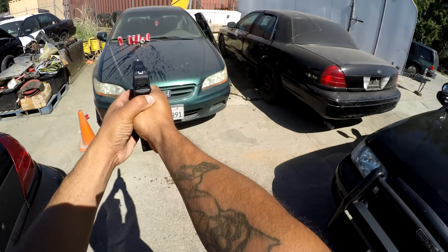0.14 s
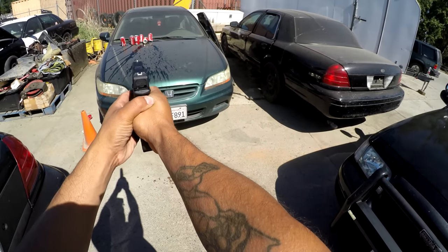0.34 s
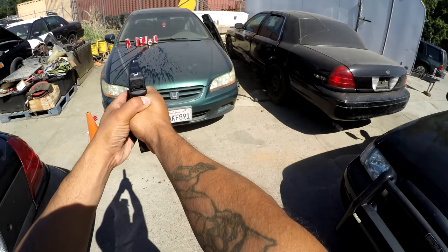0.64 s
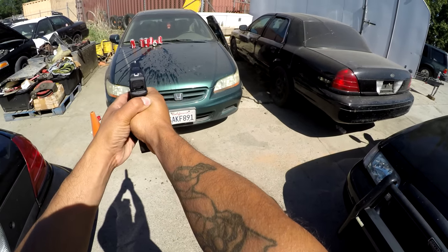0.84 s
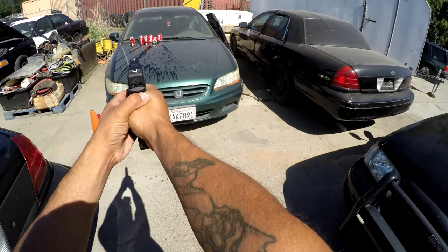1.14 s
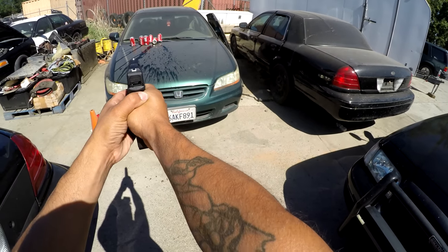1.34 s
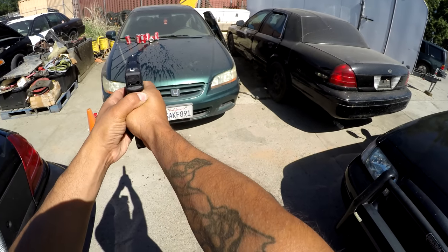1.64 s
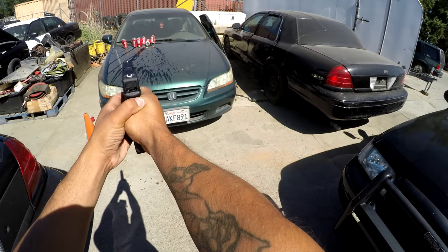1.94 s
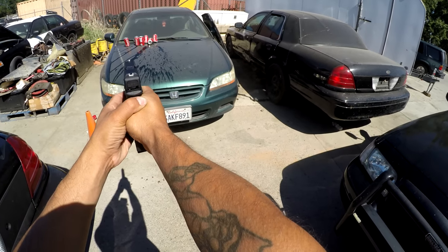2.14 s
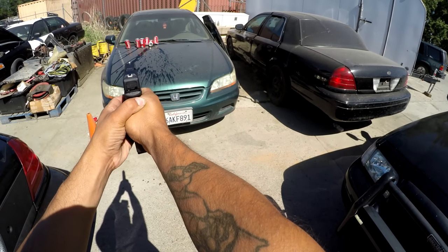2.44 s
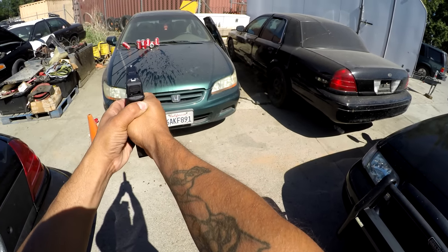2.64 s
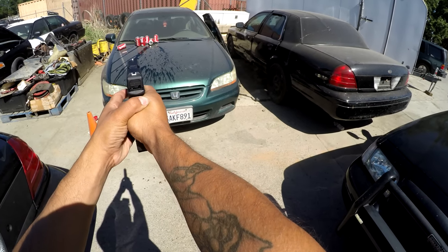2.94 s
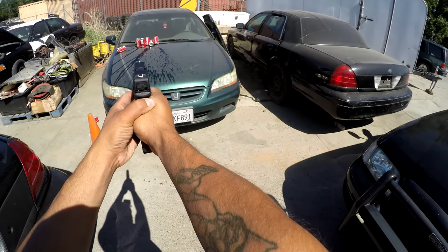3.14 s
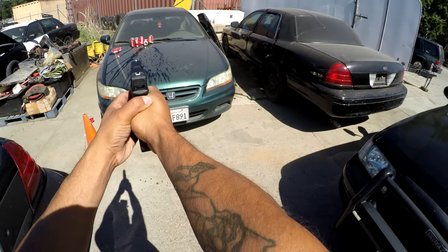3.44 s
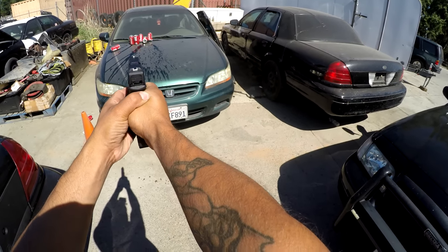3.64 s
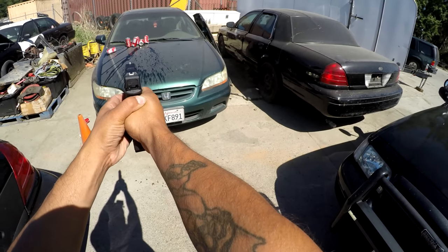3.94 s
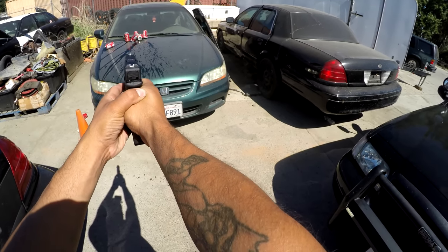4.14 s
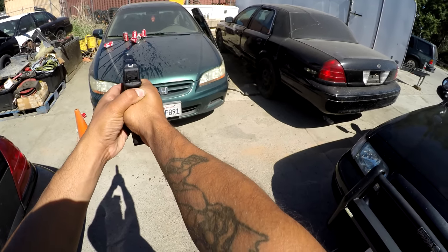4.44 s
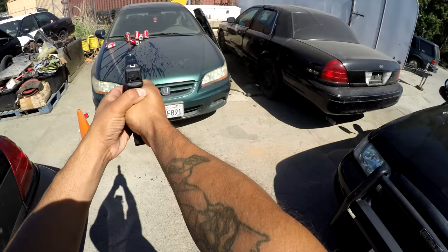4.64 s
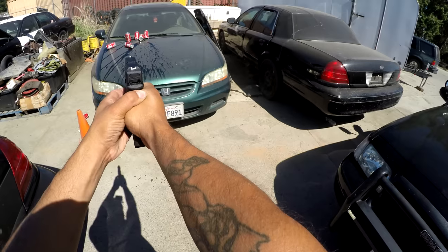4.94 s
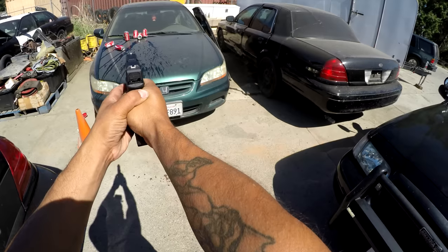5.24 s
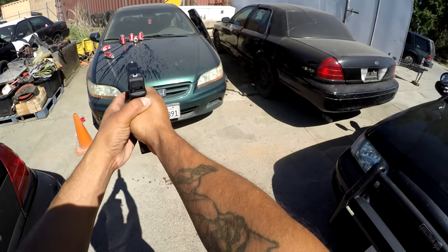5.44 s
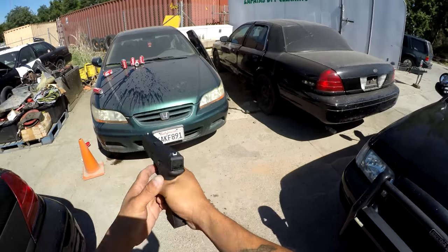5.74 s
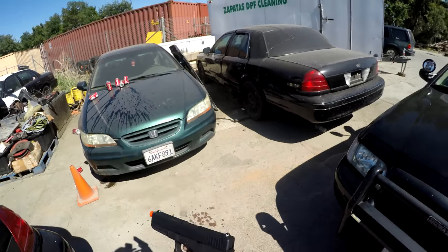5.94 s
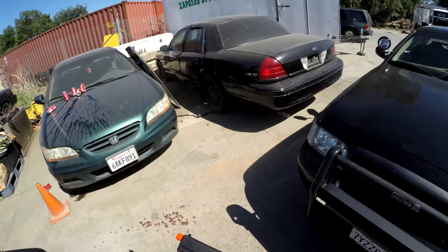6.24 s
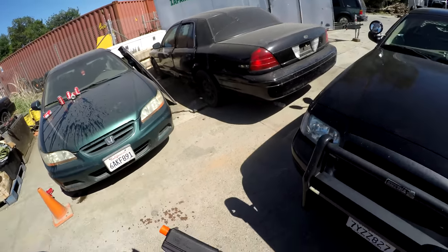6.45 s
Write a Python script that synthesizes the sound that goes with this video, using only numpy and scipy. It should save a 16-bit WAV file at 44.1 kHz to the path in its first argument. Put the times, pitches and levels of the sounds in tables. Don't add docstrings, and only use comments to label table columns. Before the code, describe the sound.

In an open paved yard, faint wind and a far road drone precede a small click, then four loud distorted airsoft pistol shots a little over a second apart. After the second, cans thud and rattle across thin car metal; more thuds and tinny rings follow the later shots. The close microphone overloads and its background sinks after each shot. A magazine catch snaps near the end, then a heavier metallic knock rings.

```python
import sys
import numpy as np
from scipy import signal
from scipy.io import wavfile

SR = 44100
rng = np.random.default_rng(int(sys.argv[2]) if len(sys.argv) > 2 else 0)


def master(y):
    cut = np.clip(np.atleast_2d(y).T, -1, 1)
    pcm = np.round(cut * 32767)
    wavfile.write(sys.argv[1], SR, pcm.astype(np.int16))


def decibels_to_gain(level_db):
    exponent = np.asarray(level_db, float) / 20
    return 10 ** exponent


N = 290178


def rms_one(x):
    return x / np.sqrt(np.mean(x ** 2) + 1e-20)


def at_hz(points, hz):
    table = np.array(points)
    return np.interp(np.log(hz), np.log(table[:, 0]), table[:, 1])


def in_time(rows):
    s, *columns = np.transpose(rows)
    return [np.interp(np.arange(N) / SR, s, c) for c in columns]


def clicks(rows, db):
    out = np.full(N, 1e-18)
    out[(np.array(rows)[:, 0] * SR).astype(int)] = decibels_to_gain(db)
    return out


def band(x, low_hz, high_hz):
    return signal.sosfilt(signal.butter(2, [low_hz, high_hz], "band", fs=SR, output="sos"), x)


def flicker(rate):
    r = np.exp(-2 * np.pi * rate / SR)
    wander = signal.lfilter([1], [1, -2 * r, r * r], rng.standard_normal(N + SR))
    return rms_one(wander[SR:])


EDGES = 100 * 2 ** np.arange(0, 7.6, .5)


def coloured(spectrum, shape):
    white = rng.standard_normal((2, N))
    mids = np.sqrt(EDGES[1:] * EDGES[:-1])
    gains = decibels_to_gain(at_hz(spectrum, mids))
    gains = gains / np.sqrt(np.sum(gains ** 2 * np.diff(EDGES)) / (SR / 2))
    used = [k for k in range(len(mids)) if gains[k] > gains.max() / 300]
    return sum(gains[k] * band(white[k % 2] * shape(mids[k]), EDGES[k], EDGES[k + 1]) for k in used)


def puffs(rows, db, spectrum, t60s):
    starts = clicks(rows, db)

    def dying(hz):
        return signal.lfilter([1], [1, -decibels_to_gain(-60 / (at_hz(t60s, hz) * SR))], starts)

    return coloured(spectrum, dying)


def struck(rows, db, modes, spread_db, contact_s=0):
    out, luck = 0, rng.standard_normal((len(rows), len(modes)))
    fade = decibels_to_gain(-60 / (contact_s * SR + 1e-9))
    for k, (hz, mode_db, t60) in enumerate(modes):
        r, w = decibels_to_gain(-60 / (t60 * SR)), 2 * np.pi * hz / SR
        hits = clicks(rows, db + mode_db + spread_db * luck[:, k])
        if contact_s:
            hits = signal.lfilter([np.sqrt(1 - fade ** 2)], [1, -fade], hits) * rng.standard_normal(N)
        out = out + signal.lfilter([0, np.sin(w)], [1, -2 * r * np.cos(w), r * r], hits)
    return out


def wavering(modes, strikes):
    out = np.zeros(N + SR)
    place = np.linspace(-2, 2, 9)
    all_lucks = rng.uniform(-0.79, 1, (len(strikes), len(modes), 9))
    for (s, db, near_hz, loss_db), lucks in zip(strikes, all_lucks):
        i = round(s * SR)
        for (hz, width_hz, mode_db, t60), luck in zip(modes, lucks):
            level_db = db + mode_db - loss_db * np.log2(hz / near_hz) ** 2
            if level_db < -80:
                continue
            age = np.arange(int(t60 * SR * (level_db + 90) / 60)) / SR
            cluster = hz + width_hz * (place + luck / 4)
            sines = np.sin(2 * np.pi * cluster[:, None] * age + luck[::-1, None])
            tone = np.exp(-place ** 2 / 2) / 2 @ sines
            onset = -np.expm1(-age / 0.00098)
            out[i:i + len(age)] += tone * decibels_to_gain(level_db - 60 * age / t60) * onset
    return out[:N]


# start in seconds, strength in dB
SHOTS = [
    (1.3360, 0),
    (2.4920, 0),
    (3.7224, 0),
    (4.8162, 0),
]
EARLIER_SHOT_S, DUCK_DB = -0.38, -8.5
DUCK_ATTACK_S, DUCK_HOLD_S, RECOVER_S = 0.15, 0.37, 0.48


def ducking():
    shape = np.cumsum([0, DUCK_ATTACK_S, DUCK_HOLD_S, RECOVER_S])
    starts = [EARLIER_SHOT_S] + [s for s, db in SHOTS]
    t = np.arange(N) / SR
    return np.min([np.interp(t, s + shape, [0, DUCK_DB, DUCK_DB, 0]) for s in starts], axis=0)


# time in seconds, level in dB
GUSTS = [(0, -44.5), (.14, -46), (.38, -44), (.6, -50), (.79, -42.5), (1.23, -42), (1.61, -49),
         (1.76, -46.5), (1.96, -52), (2.46, -42), (3.0, -46), (3.26, -44), (3.74, -34.5), (4.13, -49.5),
         (4.99, -42.5), (5.31, -49), (5.68, -44), (6.58, -43.5)]
# time in seconds, engine drone in dB, traffic in dB,
# tyre hiss change in dB
ROAD = [(0, -39.5, -45.5, 2), (.6, -41.5, -48, 0.5), (1.3, -44.5, -48.5, 0.5), (1.65, -47, -51, 4),
        (1.8, -42.5, -50, -1.5), (2.3, -46.5, -51, -2), (3.2, -43.5, -45, 2.5), (3.6, -41.5, -49, 1.5),
        (4.1, -43.5, -49.5, -6), (4.4, -42, -49.5, -1.5), (5.3, -43.5, -44.5, -1), (5.7, -39, -46, 3.5),
        (5.95, -46.5, -48.5, 2), (6.2, -35.5, -46, 1), (6.4, -48.5, -48.5, 3), (6.58, -37.5, -36, 5)]
# pitch in Hz, width in Hz, level in dB
DRONE = [(57, 9.2, -2.5), (116, 4.2, -2), (136.14, 7, -2), (172.7, 14, -10.5), (227.1, 7.2, -9.5),
         (126, 34, -7), (214, 60, -10)]
# frequency in Hz, level in dB per Hz
TRAFFIC = [(150, -32), (260, -1.5), (459, -3), (505, -5), (874, -10.5), (1310, -17.5), (2500, -28.5),
           (3250, -63.5), (5500, -120)]
# frequency in Hz, level in dB per Hz
HISS = [(1180, -26.5), (2000, 1), (4230, -7.5), (4990, -9), (14700, -21.5), (15600, -24.5), (16000, -43)]
WIND_DUCKS, DRONE_DUCKS, HISS_DUCKS = 0.42, 1.2, 0.66
HISS_DB, FAR_WASH_DB, FAR_WASH_T60_S = -65, -56, 1.4


def air():
    duck_db = ducking()
    (wind_db,), (drone_db, traffic_db, tyre_db) = in_time(GUSTS), in_time(ROAD)
    wind = rms_one(band(rng.standard_normal(N), 6.1, 77))
    wind = wind * decibels_to_gain(wind_db + WIND_DUCKS * duck_db + 2.0 * flicker(8.1) + 2.0)
    drone = 0
    for hz, width, db in DRONE:
        line = band(rng.standard_normal(N), hz - width / 2, hz + width / 2)
        drone = drone + decibels_to_gain(db) * rms_one(line)
    drone = drone * decibels_to_gain(drone_db + DRONE_DUCKS * duck_db - 2.0)
    traffic = coloured(TRAFFIC, lambda hz: decibels_to_gain(0.5 * flicker(8.1)))
    traffic = traffic * decibels_to_gain(traffic_db + duck_db - 3.0)
    late = clicks([(s + 0.067, db) for s, db in SHOTS], FAR_WASH_DB)
    wash = signal.lfilter([1], [1, -decibels_to_gain(-60 / (FAR_WASH_T60_S * SR))], late)
    steady = decibels_to_gain(HISS_DB + tyre_db + HISS_DUCKS * duck_db - 1.5)
    hiss = coloured(HISS, lambda hz: 1) * np.hypot(steady, wash)
    return wind + drone + traffic + hiss


# start in seconds, level in dB, pitch in Hz, length in seconds
BUFFETS = [
    (3.018, -36, 46.3, 0.07),
    (3.172, -28.5, 37.7, 0.098),
    (3.276, -29, 44.2, 0.12),
    (3.404, -34, 55.6, 0.049),
    (3.493, -31, 43.2, .12),
    (3.646, -33.5, 40, 0.12),
]


def buffets():
    out = np.zeros(N)
    for s, db, hz, length in BUFFETS:
        age, i = np.arange(int(length * SR)) / SR, round(s * SR)
        sway = np.sin(2 * np.pi * hz * age + rng.uniform(0, 2 * np.pi))
        out[i:i + len(age)] += decibels_to_gain(db) * np.sin(np.pi * age / length) * sway
    return out


# frequency in Hz, level in dB per Hz
JET = [(400, -4), (600, -11.5), (1000, -6.5), (3000, -8), (5000, -14), (8000, -20.5), (12000, -21),
       (14500, -20.5), (16500, -30.5)]
# frequency in Hz, level in dB per Hz
YARD = [(88, -29.5), (150, 0.5), (475, -6), (555, -10.5), (1290, -4), (1420, -16.5), (3620, -15.5),
        (14800, -48), (16000, -57.5)]
# frequency in Hz, t60 in seconds
YARD_T60 = [(200, 0.42), (1000, 0.24), (4000, 0.52), (14000, .2)]


def yard():
    early = [(s + 0.016, db) for s, db in SHOTS]
    late = [(s + 0.037, db) for s, db in SHOTS]
    first = puffs(early, -21.5, JET, [(300, 0.013), (3000, 0.094), (14000, 0.069)])
    return first + puffs(late, -34.5, YARD, YARD_T60)


# start in seconds, peak in dB
THUDS = [
    (2.762, -27.5),
    (3.311, -35),
    (4.245, -27),
    (4.352, -29),
    (5.488, -30),
    (5.641, -49),
]
# frequency in Hz, level in dB per Hz
THUD = [(88, -40.5), (150, -1), (231, -1.5), (470, -3), (1220, -11), (1500, -12), (2130, -22),
        (6000, -33.5), (7800, -67), (13200, -120)]
# pitch in Hz, width in Hz, level in dB, t60 in seconds
PANEL = [(453, 40, -2, .45), (850, 50, -2, .35), (1230, 95, -2, .28), (1950, 60, -8, .15),
         (2320, 85, -6, .17), (2900, 110, -9, .08), (3270, 120, -7, .13), (3850, 110, -9, .07),
         (4200, 120, -4, .06)]
# start in seconds, level in dB, favoured pitch in Hz, loss in dB one octave away
PANEL_STRIKES = [(1.419, -40, 1010, 5.9), (1.5, -44.5, 1010, 7.7), (2.049, -65, 2300, 48),
                 (2.761, -40.5, 1120, 1.2), (2.827, -46, 2560, 2.3), (2.888, -50, 3300, 13),
                 (2.89, -48, 1240, 27), (2.945, -49, 1870, 3.8), (3.052, -49, 2760, 3.7),
                 (3.111, -40, 4280, 47), (3.177, -47.5, 2700, 18), (3.248, -48, 2610, 12),
                 (3.31, -43.5, 1260, 54), (3.348, -41.5, 3270, 60)]


def bonnet():
    thuds = puffs(THUDS, np.array(THUDS)[:, 1] - 9, THUD, [(200, 0.69), (1000, 0.31), (5000, 0.13)])
    return thuds + wavering(PANEL, PANEL_STRIKES)


# start in seconds, peak in dB
PELLETS = [(1.609, -34), (1.7972, -40.5), (1.8394, -53), (1.8646, -56), (1.9063, -47), (1.978, -51),
           (2.0144, -57), (4.244, -37), (4.597, -47), (4.626, -42.5), (4.658, -36), (5.5957, -47),
           (5.789, -49), (5.8494, -47.5)]
PELLET_RING_DB = -40
# start in seconds, peak in dB, ring share in dB
HOPS = [(1.7844, -62, 8), (2.7599, -36.5, 5), (2.826, -44, -15), (2.8499, -59, 16), (2.873, -57, 8),
        (2.8865, -51, 1), (2.9453, -48, -8), (2.9914, -45, -10.5), (3.0247, -56, 6), (3.049, -51, 5.5),
        (3.1093, -42.5, 8.5), (3.1762, -46.5, 7), (3.247, -48.5, 10), (3.3099, -48, 8.5), (3.3496, -51, 11),
        (3.4283, -64, 5.5), (3.4472, -57, -1), (4.3083, -46, 8), (4.3515, -51.5, 15), (4.3891, -44.5, 2),
        (5.119, -61, -1), (5.4874, -64, -2.5), (5.6385, -48, -12)]
# pitch in Hz, level in dB, t60 in seconds
CAN = [(1250, -20, .05), (1950, -15, .06), (2250, -14, .07), (2400, -14, .07), (2900, -14, .05),
       (3150, -13, .06), (3350, -13, .06), (3850, -14, .05), (4150, -14, .035), (4400, -15, .035),
       (5100, -17, .03), (5800, -19, .03), (6600, -19, .03)]
# frequency in Hz, level in dB per Hz
BOUNCE = [(1200, -30.5), (2000, -2.5), (3000, -6.5), (4200, 2.5), (7000, -7), (11000, -9), (15000, -17.5),
          (16500, -42)]


def bounces():
    rows = HOPS + [(s, db, PELLET_RING_DB) for s, db in PELLETS]
    s, db, ring_db = np.transpose(rows)
    cans = struck(rows, db + ring_db - 6, CAN, spread_db=4, contact_s=.05)
    return cans + puffs(rows, db - 13.5, BOUNCE, [(2000, 0.11), (14000, 0.074)])


# pitch in Hz, width in Hz, level in dB, t60 in seconds
TIN = [(465, 16.6, -4.5, 0.23), (1350, 40, 6, 0.25), (3230, 73, -3, 0.29), (3600, 110, -5, 0.52)]
# start in seconds, level in dB, favoured pitch in Hz, loss in dB one octave away
TIN_STRIKES = [(4.247, -57, 1510, 1.3), (4.255, -54, 3400, 30), (4.257, -35, 465, 20), (4.36, -45, 465, 20),
               (4.626, -61.5, 3700, 55), (5.50, -45, 465, 18), (5.595, -59, 1350, 34),
               (5.595, -57, 3180, 230), (5.64, -38, 465, 20), (5.65, -62, 3220, 190),
               (5.79, -57, 3080, 240)]
# pitch in Hz, width in Hz, level in dB, t60 in seconds
RIM = [(5000, 50, 2, 0.15), (7100, 60, -2, .08), (8700, 40, -6, .11)]
# start in seconds, level in dB, favoured pitch in Hz, loss in dB one octave away
RIM_STRIKES = [
    (1.84, -70, 8700, 99.2),
    (1.865, -67, 5000, 99),
    (1.909, -65, 7100, 99),
]
# start in seconds, #
# level in dB, pitch in Hz, t60 in seconds
PINGS = [(1.572, -51, 1215, 0.21), (1.60, -60, 1250, .3), (1.655, -65, 1240, 0.43), (1.55, -62.5, 1340, .4),
         (4.36, -65, 1400, .5), (6.30, -61, 3430, 0.9), (6.49, -37, 3000, 0.37), (3.805, -56, 2150, 0.46),
         (3.805, -55, 3590, .3), (4.247, -57, 2147, 0.45), (4.30, -65, 2163, 0.46),
         (4.353, -57, 2100, 0.43), (4.40, -63.5, 2070, 0.67), (4.665, -62.5, 2050, 0.22),
         (5.505, -58, 2056, 0.38)]
PING_WIDTH_HZ = 3


def can_rings():
    pings = sum(wavering([(hz, PING_WIDTH_HZ, 0, t60)], [(s, db, hz, 0)]) for s, db, hz, t60 in PINGS)
    return wavering(TIN, TIN_STRIKES) + wavering(RIM, RIM_STRIKES) + pings


# start in seconds, crack in dB
LATCH = [
    (6.1832, -43),
    (6.2084, -38),
    (6.2147, -30),
    (6.2174, -29),
    (6.4836, -22),
    (6.4855, -27),
    (6.5002, -30),
]
KNOCK_DB = [-42, -24, -9, -14, -24, -4, -20]
# pitch in Hz, level in dB, t60 in seconds
KNOCK = [(1000, -8, .008), (1250, -4, .009), (1500, -1, .013), (1800, -4, .010)]
# frequency in Hz, level in dB per Hz
LATCH_CRACK = [(320, -36), (550, 7), (994, -12), (1280, -7), (1800, -4), (2560, -17), (3490, -20),
               (4020, -9.5), (13900, -29), (16000, -57)]
# pitch in Hz, width in Hz, level in dB, t60 in seconds
CATCH = [(413, 28.5, -6.5, 0.18), (1760, 23, -12, 0.13), (1980, 15.4, -21.5, 0.37), (2290, 33, -16, 0.18),
         (3500, 14, -6.5, 0.15), (3290, 48, -13.5, 0.24), (3430, 68, -18, 0.33), (755, 31.6, -30, 0.65),
         (1071, 30, -30, .2), (4300, 30, -34, .2), (6370, 88, -4, 0.035)]
# start in seconds, level in dB, favoured pitch in Hz, loss in dB one octave away
CATCH_STRIKES = [
    (6.184, -39, 3380, 19.3),
    (6.217, -18, 3400, 0.088),
]
# pitch in Hz, width in Hz, level in dB, t60 in seconds
MAGAZINE = [(1007, 3, -17, .36), (2019, 4, -20, .25), (1815, 12, -10, .12), (2990, 12, -27, .25),
            (750, 25, -20, .2), (2740, 20, -22, .15), (3165, 20, -15, .14), (3273, 20, -15, .16),
            (3460, 90, -10, .1), (3725, 30, -20, .16), (4183, 30, -25, .2), (4900, 50, -14, .07),
            (5367, 30, -18, .1), (7050, 50, -10, .05)]
# start in seconds, level in dB, favoured pitch in Hz, loss in dB one octave away
MAGAZINE_STRIKES = [
    (6.4859, -13.5, 3300, 0.1),
    (6.4917, -7, 3450, 32),
]


def magazine():
    crack_db = np.array(LATCH)[:, 1]
    knocks = -band(struck(LATCH, np.array(KNOCK_DB), KNOCK, spread_db=1), 600, 3000)
    tail = puffs(LATCH, crack_db - 16.0, LATCH_CRACK, [(500, 0.34), (3000, 0.44), (14000, 0.069)])
    crack_t60 = [(400, 0.042), (2000, 0.15), (6000, 0.086), (14000, 0.045)]
    crack = puffs(LATCH, crack_db, LATCH_CRACK, crack_t60)
    rings = wavering(CATCH, CATCH_STRIKES) + wavering(MAGAZINE, MAGAZINE_STRIKES)
    return knocks + tail + crack + rings


# start in seconds, peak in dB, low ring in dB
TRIGGER = [(1.3054, -20, -6), (1.3150, -24, -6), (1.4764, -36, -6), (1.4850, -23, -14), (1.5419, -45, -3),
           (2.2254, -27, 0), (2.2662, -48, -3), (2.6469, -20, -6), (3.3922, -24, 0), (3.8912, -21, -7),
           (3.911, -42, -12), (3.99, -52, -12), (4.0792, -46, -12), (4.1346, -52, -12), (4.5327, -26, 0),
           (4.5694, -50, -8), (4.7855, -42, -3), (4.905, -40, -8), (4.958, -44, 3), (4.9693, -22, -4),
           (5.007, -42, -8)]
# pitch in Hz, level in dB, t60 in seconds
SEAR = [(2600, -10, .006), (3200, -7, .006), (4200, -1, .008), (4600, -1, .009), (5200, -8, .006),
        (6600, -9, .007), (7600, -12, .006), (9000, -11, .006)]
# pitch in Hz, width in Hz, level in dB, t60 in seconds
SPRING = [(4700, 4, -7, 2.2), (5200, 6, -4, 1.0), (5600, 5, -1, 1.3), (7750, 5, -1, 1.0)]
# start in seconds, level in dB, favoured pitch in Hz, loss in dB one octave away
SPRING_STRIKES = [
    (4.99, -70, 5500, 1),
]


def trigger():
    s, db, low_db = np.transpose(TRIGGER)
    low = struck(TRIGGER, db + low_db - 9, [(2080, 0, .018)], spread_db=0)
    sear = struck(TRIGGER, db - 9, SEAR, spread_db=1, contact_s=.012)
    tick = puffs(TRIGGER, db - 10, BOUNCE, [(2000, 0.0035), (14000, 0.0011)])
    return low + sear + tick + wavering(SPRING, SPRING_STRIKES)


# start in
# seconds, # peak in dB, low share in dB
SLAMS = [(1.3723, 1, -0.5), (1.38, -11.5, -3.5), (1.3895, -19, -28.5), (1.411, -24, -2.5), (2.528, -4, -21),
         (2.5365, -12.5, -25.5), (2.5456, -22, -8.5), (3.7576, 0, -23.5), (3.769, -11, -27.5),
         (3.7755, -17, -9.5), (4.2438, -36, -1.5), (4.3512, -43, 2), (4.8394, -22.5, -12),
         (4.848, -24, -14.5), (4.856, -16, -21.5), (4.8635, -8.5, -22.5), (4.8704, -32.5, -18),
         (5.4866, -51.5, 17.5)]
# frequency in Hz, level in dB per Hz
SLAM = [(180, -36), (300, -1.5), (667, -21), (1690, -4.5), (2000, -7), (3190, -7), (4020, -2.5), (5340, -8),
        (12500, -16), (16000, -25)]
# frequency in Hz, t60 in seconds
CRACK_T60 = [(400, 0.039), (4000, 0.018), (14000, .012)]
# frequency in Hz, t60 in seconds
SLAM_T60 = [(400, 0.11), (1500, 0.05), (4000, 0.055), (14000, 0.05)]
# pitch in Hz, width in Hz, level in dB, t60 in seconds
SLIDE_BODY = [(2020, 30, -3.5, 0.042), (2780, 230, 1.5, .015), (4100, 120, -0.5, 0.027),
              (5070, 74, -7.5, 0.023), (6660, 160, -1, 0.0063)]
# start in seconds, level in dB, favoured pitch in Hz, loss in dB one octave away
SLIDE_STRIKES = [(1.3757, -21.5, 3710, 12), (1.382, -18, 3320, 6), (1.388, -16, 4100, 10),
                 (1.4060, -32.5, 4300, 40), (1.4125, -33, 2800, 40), (2.5290, -14.5, 4010, 12),
                 (2.5388, -15.5, 3725, 12), (2.5443, -18, 3730, 8), (2.5695, -36, 2500, 30),
                 (3.7576, -12, 5860, 12), (3.7690, -20.5, 3500, 6), (3.7760, -19, 3010, 5),
                 (4.8480, -28.5, 3000, 30), (4.8640, -24, 3300, 6), (4.87, -16.5, 3460, 5)]


def slide():
    s, db, low_db = np.transpose(SLAMS)
    low_modes = [(640, -3.5, .014), (1100.0, -3.0, 0.014), (1350, -7.5, 0.008)]   # Hz, dB, t60 s
    knock = struck(SLAMS, db + low_db, low_modes, spread_db=2.0)
    crack = puffs(SLAMS, db - 10.5, SLAM, CRACK_T60) + puffs(SLAMS, db - 15.5, SLAM, SLAM_T60)
    return np.roll(crack + knock, round(.0006 * SR)) + wavering(SLIDE_BODY, SLIDE_STRIKES)


# delay in seconds, rise in seconds, t60 in seconds, end in seconds
JETS = [
    (-.0030, .0040, .5, .0028),
    (.0028, .0008, .5, .0057),
    (.0057, .0003, .02, .0072),
    (.0072, .0008, .03, .0090),
    (.0112, .0004, .028, .0158),
]
JET_DB = [-0.5, -7.5, -6, -9.5, -0.5]
# delay in seconds, strength in full scales,
# length in seconds
PUSHES = [
    (.0025, -.8, .0037),
    (.0057, .4, .0007),
    (.0062, -.85, .0008),
    (.0069, .9, .0014),
    (.0073, .8, .0010),
    (.0082, -1.3, .0018),
    (.0086, -.8, .0022),
    (.0107, .3, .0030),
    (.0136, .3, .0030),
    (.0160, .2, .0075),
]
# delay in seconds, level in dB
CONTACTS = [(.0009, -2), (.0017, 0), (.0059, 2), (.0083, -3), (.0114, 4), (.0124, -1), (.0133, -4),
            (.0146, -6)]
# pitch in Hz, level in dB, t60 in seconds
VALVE = [(1620, -8, .006), (2850, -2, .008), (3900, -6, .010), (6500, -7, .006)]
# pitch in Hz, level in dB, t60 in seconds
BARREL = [(1140, 0, .012)]
# delay in seconds, level in dB
BARREL_KICKS = [(-.0014, -24), (-.0005, -17), (.0006, -11), (.0015, -17), (.0110, -14), (.0119, -10)]
GAS_LOW_HZ = 1150
REPEAT_SHARE = .45


def blast():
    gate, swing, age = np.zeros(N), np.zeros(N), np.arange(SR // 5) / SR
    for s, db in SHOTS:
        for (delay, rise, t60, end), jet_db in zip(JETS, JET_DB):
            i = round((s + delay) * SR)
            opening = np.minimum(age / rise, 1) ** 2
            closing = np.clip((end - delay - age) * 2000, 0, 1)
            gate[i:i + len(age)] += decibels_to_gain(jet_db + db - 60 * age / t60) * opening * closing
        for delay, strength, length in PUSHES:
            i = round((s + delay) * SR)
            swing[i:i + len(age)] += strength * decibels_to_gain(db) * np.sin(np.pi * np.minimum(age / length, 1))
    high_pass = signal.butter(4, GAS_LOW_HZ, "high", fs=SR, output="sos")
    gas = signal.sosfilt(high_pass, coloured(JET, lambda hz: gate))
    starts = [round((s - .005) * SR) for s, db in SHOTS]
    first = gas[starts[0]:starts[0] + len(age)].copy()
    for i in starts[1:]:
        own = gas[i:i + len(age)]
        gas[i:i + len(age)] = np.sqrt(REPEAT_SHARE) * first + np.sqrt(1 - REPEAT_SHARE) * own
    hits = [(s + delay, db + hit_db) for s, db in SHOTS for delay, hit_db in CONTACTS]
    metal = struck(hits, np.array(hits)[:, 1] - 4, VALVE, spread_db=1)
    kicks = [(s + delay, db + kick_db) for s, db in SHOTS for delay, kick_db in BARREL_KICKS]
    barrel = struck(kicks, np.array(kicks)[:, 1], BARREL, spread_db=.7)
    return swing + gas + metal + barrel


def scene():
    behind = air() + buffets() + yard()
    car = bonnet() + bounces() + can_rings()
    pistol = magazine() + trigger() + slide() + blast()
    return (behind + car + pistol)[None]


def band_limit(x):
    return signal.sosfilt(signal.butter(12, 16440, fs=SR, output="sos"), x)


def record(dry):
    clipped = .88 * dry / (1 + np.abs(dry) ** 6) ** (1 / 6)
    low_pass = signal.cheby2(14, 80, 16300, fs=SR, output="sos")
    mix = signal.sosfilt(low_pass, clipped)
    return band_limit(mix)


dry = scene()
out = record(dry)
master(out)
```